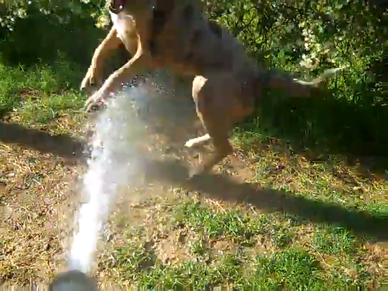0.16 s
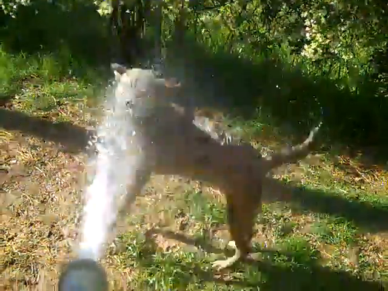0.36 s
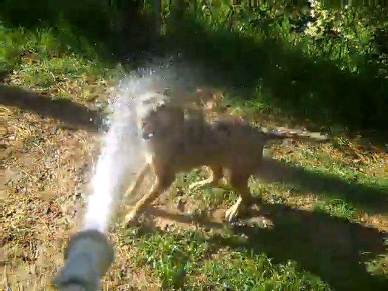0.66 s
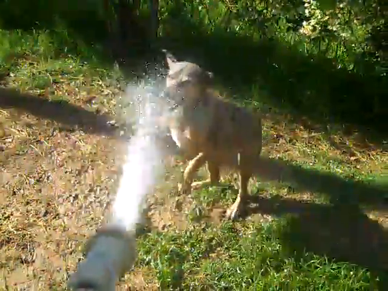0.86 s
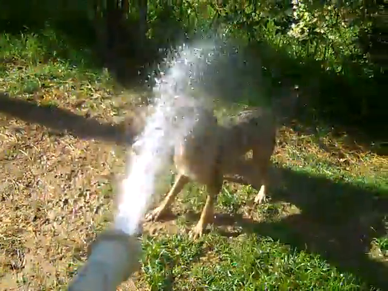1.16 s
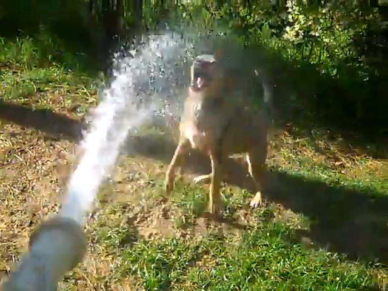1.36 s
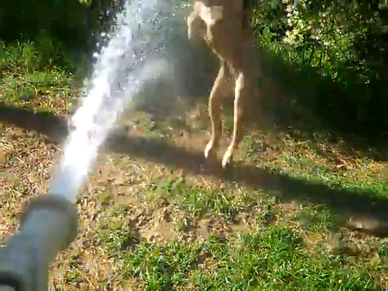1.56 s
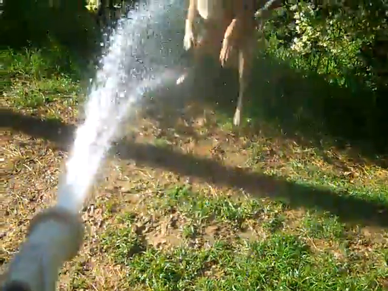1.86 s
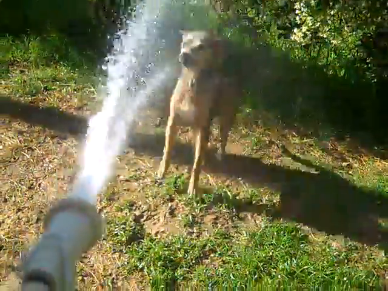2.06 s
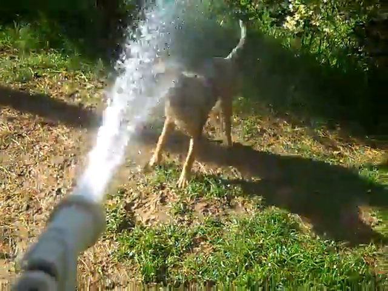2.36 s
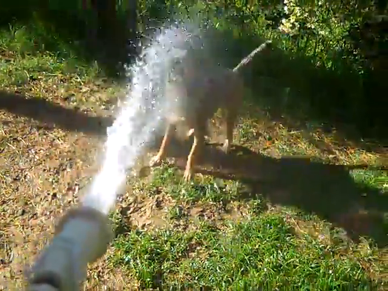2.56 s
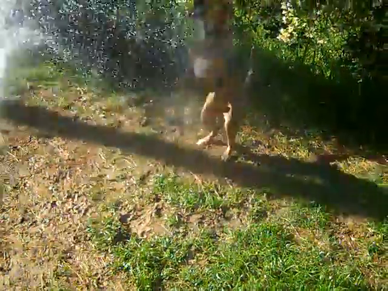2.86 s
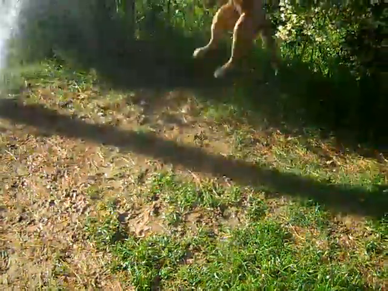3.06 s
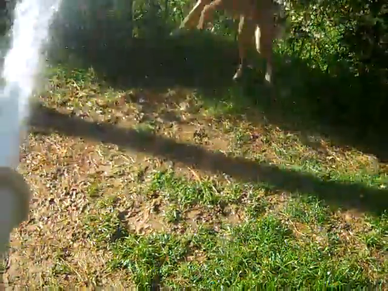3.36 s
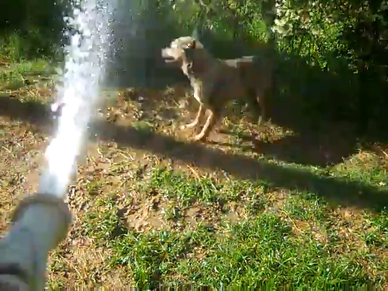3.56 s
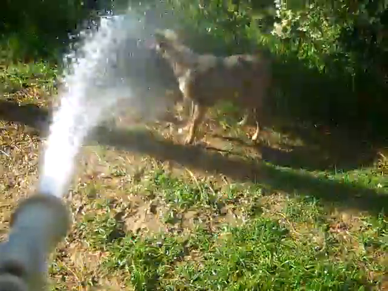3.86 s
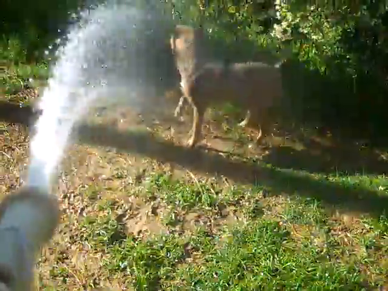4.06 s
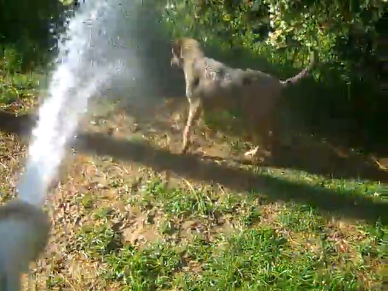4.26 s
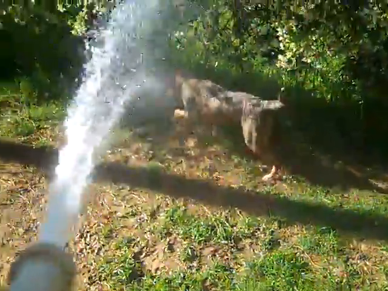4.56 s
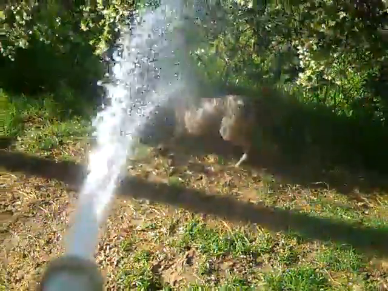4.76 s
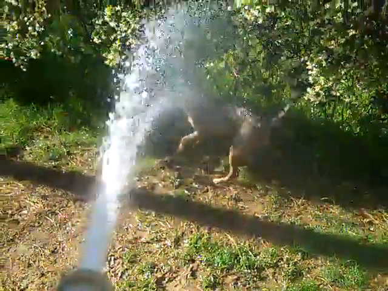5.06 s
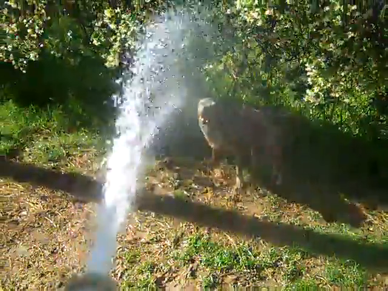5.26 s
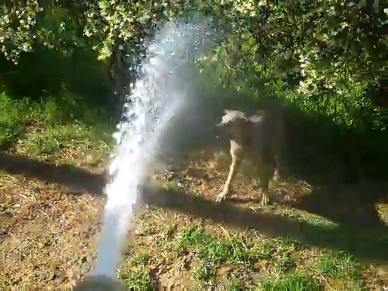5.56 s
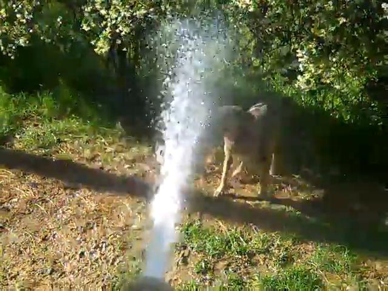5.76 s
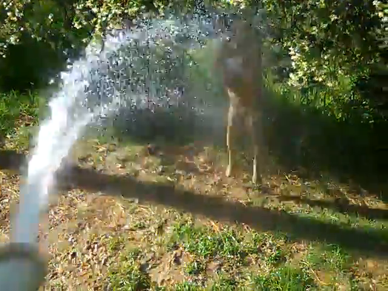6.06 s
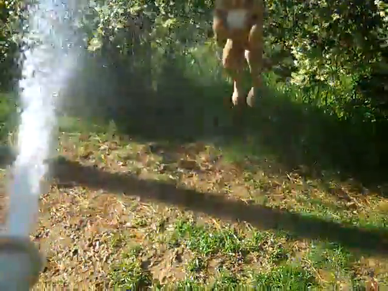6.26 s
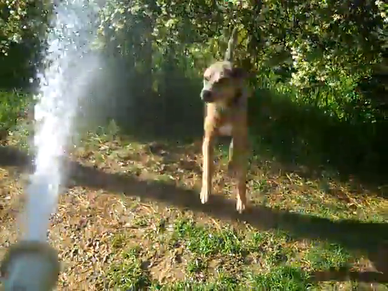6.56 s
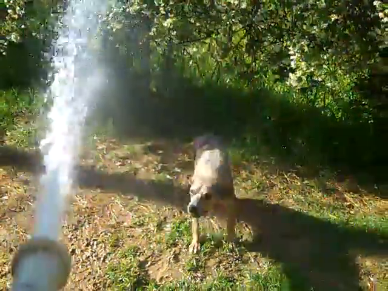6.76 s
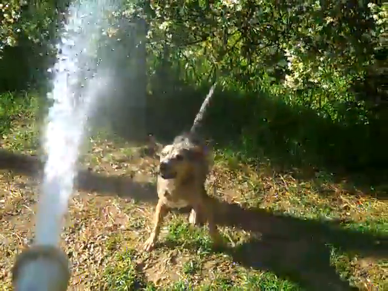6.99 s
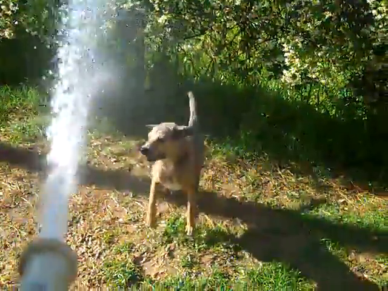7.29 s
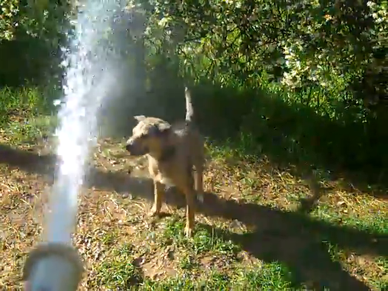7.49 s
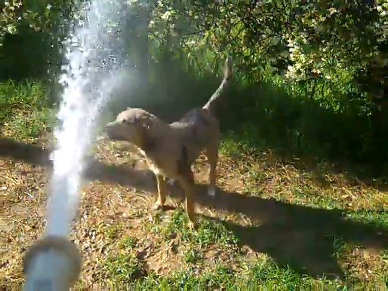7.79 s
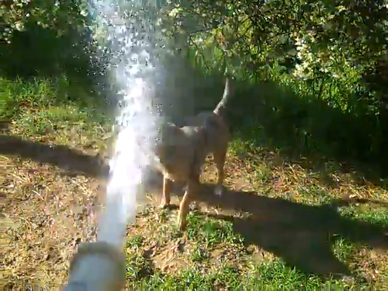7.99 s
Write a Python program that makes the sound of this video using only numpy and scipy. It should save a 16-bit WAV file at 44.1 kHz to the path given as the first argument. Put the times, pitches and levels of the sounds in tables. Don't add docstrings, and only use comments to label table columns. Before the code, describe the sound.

A garden hose jet hisses continuously close to a small outdoor microphone, bright and narrow like breathy whistling, with finer spray beneath. Low air puffs buffet the microphone, mostly early. Short dull knocks from a jumping dog's paws and jaws come in clusters, then a loud hollow mouth clop near five seconds and a gritty skid in wet soil late. Nearly everything is on the left; the right holds only very faint electronic noise.

```python
import sys
import numpy as np
from scipy import signal
from scipy.io import wavfile
from scipy.ndimage import uniform_filter1d

SR = 44100
rng = np.random.default_rng(int(sys.argv[2]) if len(sys.argv) > 2 else 0)


def level_to_linear(level):
    exponent = np.asarray(level, float) / 20
    return 10 ** exponent


def master(y):
    cut = np.clip(np.atleast_2d(y).T, -1, 1)
    pcm = np.round(cut * 32767)
    wavfile.write(sys.argv[1], SR, pcm.astype(np.int16))


N = 358512


def evened(x):
    return x / np.sqrt(np.mean(x ** 2) + 1e-20)


def read(points, hz):
    f, value = np.transpose(points)
    return np.interp(np.log(hz + 1), np.log(f + 1), value)


def add(mix, s, sound):
    part = mix[max(round(s * SR), 0):][:len(sound)]
    part += sound[:len(part)]


def noise(magnitude, size):
    z = rng.standard_normal((magnitude.shape[1], magnitude.shape[0], 2)).T
    spectra = (z[0] + 1j * z[1]) * magnitude * np.sqrt(1.5 * SR / size)
    return signal.istft(spectra, nperseg=size, noverlap=size * 3 // 4)[1][:N]


def grid(size):
    frames = np.arange(N * 4 // size + 5)
    return np.fft.rfftfreq(size, 1 / SR)[:, None], frames * size / 4 / SR


def in_band(shape, hz, lo_hz, hi_hz):
    inside = (hz > lo_hz) & (hz < hi_hz)
    return shape / np.sqrt((shape ** 2 * inside).sum(0) * hz[1])


def band_pass(x, lo_hz, hi_hz):
    return signal.lfilter(*signal.butter(2, [lo_hz, hi_hz], "band", fs=SR), x)


def flutter(rate):
    pole = np.exp(-2 * np.pi * rate / SR)
    return evened(signal.lfilter([1], [1, -pole], rng.standard_normal(N)))


# (frequency [Hz], level [dB per Hz])
AMPLIFIER_COLOUR = [(26, -5), (61, 8), (151, 16), (351, 19.5), (801, 16.5), (1710, 13), (2610, 8.5),
                    (4600, 5.5), (6010, 1), (7800, 9), (10100, -4), (14400, -8)]
# (time [s], length [s], pitch [Hz], level [dB])
MEMORY_BUZZES = [(2.503, .19, 182.6, -53), (2.70, .14, 292.7, -54), (3.203, .18, 184.7, -55),
                 (6.005, .19, 183.0, -51), (6.733, .19, 183.7, -53)]
# (frequency [Hz], level [dB])
BUZZ_SPECTRUM = [(151, .1), (551, -2.1), (1010, -7.1), (1410, -14.1), (1760, -7.1), (2260, .1),
                 (2610, -3.1), (3010, -18), (4900, -24)]


def dead_input():
    hz, frames = grid(size=512)
    hiss = level_to_linear(-55.0) * evened(noise(level_to_linear(read(AMPLIFIER_COLOUR, hz)) + 0 * frames, size=512))
    t = np.arange(N) / SR
    pictures_per_s = 15.002
    picture = t * pictures_per_s
    ms = (picture % 1) / pictures_per_s * 1000
    strength = level_to_linear(2 * rng.standard_normal(200))[picture.astype(int)]
    swell = 1.5 * ms / 3.5 * np.exp(1 - ms / 3.5)
    kick = level_to_linear(-61) * (ms - 3.2) * np.exp(-((ms - 3.2) / 1.8) ** 2)
    out = hiss * np.sqrt(1 + (strength * swell) ** 2) + kick
    for s, length, f, db in MEMORY_BUZZES:
        u = np.arange(0, length, 1 / SR)
        k = np.arange(1, int(5000 / f))[:, None]
        harmonics = level_to_linear(read(BUZZ_SPECTRUM, k * f)) * np.cos(2 * np.pi * k * f * u + 0.33 * k)
        add(out, s, level_to_linear(db) * evened(harmonics.sum(0)) * signal.windows.tukey(len(u), .06))
    return out


# (time [s], level [dB])
BREEZE = [(0.1, -57), (0.27, -45.5), (0.5, -50), (0.77, -61.5), (1.05, -49.5), (1.4, -56), (3, -58),
          (6, -57), (7.8, -59)]
# (time of peak [s], level [dB], frequency [Hz])
AIR_PUFFS = [(0.195, -33, 91), (0.22, -30, 111), (0.265, -30, 161), (0.276, -29, 148), (0.288, -30, 118),
             (0.33, -34, 117), (0.35, -27, 108), (0.385, -29, 143), (0.395, -26, 170), (0.407, -31, 178),
             (0.424, -28, 120), (0.736, -33, 134), (0.773, -31, 129), (1.0, -29, 114), (1.013, -30, 115),
             (1.025, -30, 110), (1.102, -31, 109), (1.116, -30, 118), (1.238, -37, 112), (2.68, -29, 132),
             (2.716, -32, 147), (2.76, -29, 129), (2.797, -36, 115), (3.598, -31, 119), (4.088, -34, 104),
             (4.129, -37, 127), (4.8, -32, 124), (4.814, -35, 122), (5.615, -26, 126), (6.314, -37, 128)]
STRAY_EDDIES = [.07, .098, .149, .185, .306, .371, .505, .724, .763, 1.081, 1.3, 1.495, 1.807, 1.864, 2.19,
                2.695, 2.788, 2.812, 2.83, 2.843, 3.113, 3.15, 3.663, 4.102, 4.921, 5.091, 5.157, 7.382,
                7.396, 8.09]


def wind():
    hz, t = grid(size=1024)
    bass_cut = (hz / 65) ** 3 / (1 + (hz / 65) ** 3)
    shape = bass_cut / np.sqrt(1 + (hz / 210) ** 6)
    level_db = np.interp(t, *np.transpose(BREEZE))
    rumble = noise(in_band(shape, hz, 40, 250) * level_to_linear(level_db), size=1024)
    rumble = rumble * level_to_linear(3.0 * flutter(10.0))
    eddy_db, eddy_hz = -40, 114
    puffs, u = np.zeros(N), np.arange(-.01, .01, 1 / SR)
    for s, db, f in AIR_PUFFS + [(s, eddy_db, eddy_hz) for s in STRAY_EDDIES]:
        add(puffs, s - .01, -level_to_linear(db + 4) * np.exp(-(4.7 * f * u) ** 2))
    return rumble + signal.lfilter(*signal.butter(3, 62., "high", fs=SR), puffs)


# (time [s], peak level [dB], frequency [Hz], share of wide snap [0-1])
PAW_KNOCKS = [(0.476, -23, 350, 0.65), (0.506, -24, 930, 0.42), (.52, -31, 523, .2),
              (0.537, -20.5, 2330, 0.54), (0.54, -33, 355, .1), (.585, -25, 614, 0.33),
              (.63, -33.5, 830, 0), (0.646, -30, 1400, 0.55), (.755, -26, 1000, 0.62),
              (1.092, -21.5, 410, 0.55), (1.25, -22, 980, 0.62), (1.291, -19, 1070, 0.59),
              (1.29, -17.5, 2380, 0.74), (2.01, -26, 810, 0.41), (2.22, -27, 700, 0.67),
              (3.022, -25, 412, 0.7), (3.046, -19, 410, 0.72), (3.047, -30, 1550, .1),
              (3.046, -31, 2120, 0.046), (3.104, -28, 1100, 0.027), (3.67, -22, 3170, 0.44),
              (4.888, -30.5, 760, .1), (4.915, -30, 380, 0.4), (4.918, -24, 1100, 0.22)]
# (time [s], peak level [dB], frequency [Hz], share of wide snap [0-1])
LONG_RINGS = [
    (2.434, -30, 1400, 0.2),
    (4.904, -19.5, 855, 0.34),
    (4.932, -33, 930, 0.24),
    (4.956, -27, 773, 0.17),
]
# (time [s], length [s], level [dB], low edge [Hz], high edge [Hz])
PAW_SKIDS = [(6.655, .05, -41, 350, 2200), (6.698, .035, -37, 320, 1100), (6.715, .065, -38, 500, 1800),
             (6.695, .09, -36, 1200, 2700), (6.68, .11, -37, 3300, 4600), (.49, .07, -43, 300, 2500),
             (.62, .06, -43, 800, 2000)]


def dog():
    out, t = np.zeros(N), np.arange(6000) / SR
    hits = [(*k, .036 * (k[2] / 1000) ** -0.1) for k in PAW_KNOCKS]
    hits += [(*c, .085) for c in LONG_RINGS]
    for s, db, f, snap, t60 in hits:
        ring = np.sin(2 * np.pi * f * t) * level_to_linear(-60 * t / t60) * (1 - np.exp(-t / 0.0012))
        crack = band_pass(rng.standard_normal(len(t)), 500, 6000) * level_to_linear(-60 * t / .02)
        add(out, s, level_to_linear(db) * ((1 - snap) * ring + 1.5 * snap * crack))
    for s, length, db, lo_hz, hi_hz in PAW_SKIDS:
        grit, lumps = rng.standard_normal((2, len(t)))
        grains = grit * level_to_linear(4 * evened(uniform_filter1d(lumps, size=150)))
        scrape = evened(band_pass(grains, lo_hz, hi_hz))[:int(length * SR)]
        add(out, s, level_to_linear(db) * scrape * signal.windows.tukey(len(scrape), .85))
    return out


# (start [s], end [s], first delay [ms], last delay [ms], share reflected [0-1])
HAND_GRIPS = [
    (-.3, 4.3, 2.2, 2.38, .1),
    (.9, 3.6, 1.2, 1.2, .1),
    (4.4, 5.98, 1.45, 1.455, .36),
    (6.0, 8.4, 1.253, 1.266, .42),
]


def hand(hz, t):
    comb = 1
    regrip_s = 0.27
    for start, end, first, last, share in HAND_GRIPS:
        held = np.clip(np.minimum(t - start, end - t) / regrip_s, 0, 1)
        mirror = share * held * np.exp(-((hz - 6900) / 3000) ** 2)
        delay_s = np.interp(t, [start, end], [first, last]) / 1000
        turn = np.exp(-2j * np.pi * hz * delay_s)
        comb = comb * (1 + mirror * turn) / np.sqrt(1 + mirror ** 2)
    return comb


# (time [s], nearness of the nozzle [dB], whistle [Hz], how far the mist faces the microphone [dB])
JET_AIM = [(0.0, -20, 7740, -13), (1.0, -18.5, 7730, -15.5), (2.03, -20, 7770, -12.5),
           (2.76, -20, 7730, -13), (3.08, -17.5, 7900, -17.5), (3.69, -20.5, 7800, -15),
           (4.03, -18, 7700, -14), (4.12, -18.5, 7880, -16.5), (4.26, -20.5, 7760, -14),
           (4.4, -19, 7920, -13.5), (5.48, -20.5, 7880, -12), (5.6, -18, 7870, -12),
           (5.81, -20.5, 7760, -11.5), (6.17, -19, 7850, -11.5), (6.3, -19.5, 7880, -13.5),
           (7.1, -20, 7750, -12), (8.0, -19.5, 7800, -13.5), (8.13, -21.5, 7720, -12.5)]
# (frequency [Hz], level [dB per Hz])
SPRAY_COLOUR = [(31, -42), (101, -10), (201, -13), (335, -12), (1060, -6), (1310, -7), (2620, -2.5),
                (3020, -0.5), (3360, 4), (4810, 1.5), (7010, -9), (10010, -26), (14300, -32)]
# (frequency [Hz], level [dB per Hz])
MIST_COLOUR = [(3200, -58), (5200, 1.5), (6200, -6.5), (9200, 9.5), (11200, 6), (14300, 2)]


def jet():
    hz, t = grid(size=512)
    s, *columns = np.transpose(JET_AIM)
    whistle_db, centre, facing_db = (np.interp(t, s, c) for c in columns)
    mist_db = whistle_db + facing_db
    spray_db = whistle_db - 17.5 + 0.72 * (facing_db + 14)
    width = 1650. + 102.0 * (mist_db + 36)
    whistle_db, spray_db, mist_db = whistle_db - .3, spray_db - .8, mist_db - .9
    spray_db = -37.5 + (spray_db + 37.5) * np.clip(hz / 4000, .4, 1)

    whistle = 1 / (1 + (2 * (hz - centre) / width) ** 2) * np.minimum(hz / 5500, 1) ** 2
    whistle /= np.sqrt(1 + 0.42 * np.clip((hz - 8800) / 700, 0, 1))
    spray = level_to_linear(read(SPRAY_COLOUR, hz))
    mist = level_to_linear(read(MIST_COLOUR, hz))
    power = (level_to_linear(whistle_db) * in_band(whistle, hz, 6000, 9500)) ** 2
    power += (level_to_linear(spray_db) * in_band(spray, hz, 2500, 5000)) ** 2
    power += (level_to_linear(mist_db) * in_band(mist, hz, 10500, 14000)) ** 2

    patches = rng.standard_normal((len(t), len(hz))).T
    patches = uniform_filter1d(patches, size=14, axis=0)
    patches = evened(uniform_filter1d(patches, size=12, axis=1))
    hiss = noise(np.sqrt(power) * hand(hz, t) * level_to_linear(0.81 * patches), size=512)
    sway_db = .5 * flutter(2)
    slugs_db = 0.25 * flutter(25.0) + 0.69 * flutter(107.0)
    return hiss * level_to_linear(sway_db + slugs_db)


def scene():
    left_db = 6.02
    return np.array([level_to_linear(left_db) * (jet() + wind() + dog()), dead_input()])


# (low edge [Hz], high edge [Hz], drop-out level re usual [dB], width [bins], length [frames])
WEAK_BANDS = [(2100, 3250, -3.5, 3, 2), (2900, 14200, -1.3, 7, 3)]


def starve(x, lo_hz, hi_hz, under_db, wide, long):
    hz, t, z = signal.stft(x, SR, nperseg=2048, noverlap=1024)
    power = uniform_filter1d(abs(z) ** 2, size=wide, axis=0)
    power = uniform_filter1d(power, size=long, axis=1)
    weak = power < level_to_linear(2 * under_db) * uniform_filter1d(power, size=25, axis=1)
    weak &= ((hz > lo_hz) & (hz < hi_hz))[:, None]
    return signal.istft(z * np.where(weak, .03, 1), SR, nperseg=2048, noverlap=1024)[1][:N]


def roll_off(x):
    return signal.sosfilt(signal.butter(12, 14410, fs=SR, output="sos"), x)


def record(dry):
    leak_db, dull = -51, .5
    leak = level_to_linear(leak_db) * signal.lfilter([1, dull], [1 + dull], dry[0])
    edge = signal.firwin(1501, 14215, window=("kaiser", 9), fs=SR)
    limited = signal.oaconvolve(np.array([dry[0], dry[1] + leak]), edge[None], "same")
    mix = np.array([starve(v, *band) for v, band in zip(limited, WEAK_BANDS)])
    return roll_off(mix)


dry = scene()
out = record(dry)
master(out)
```